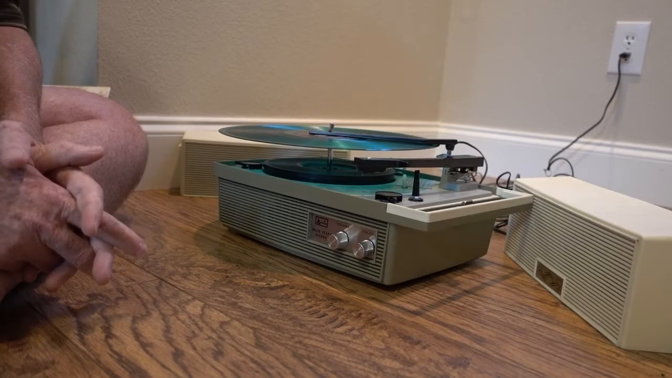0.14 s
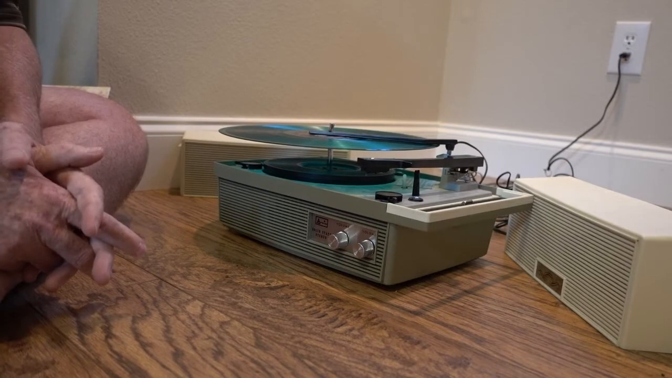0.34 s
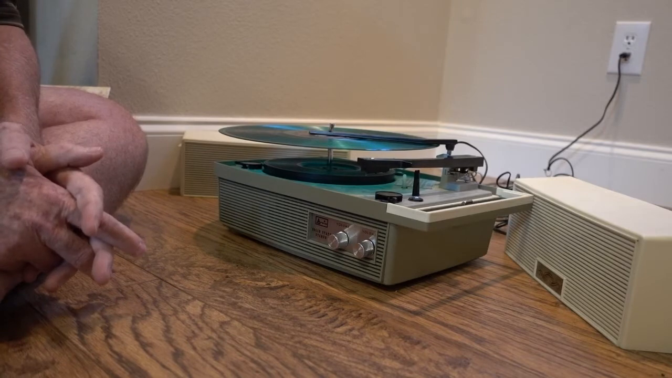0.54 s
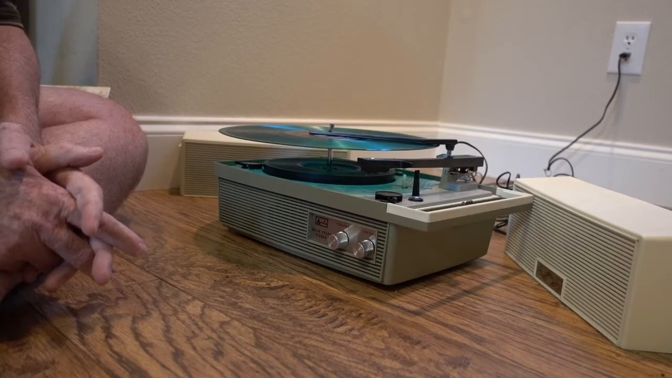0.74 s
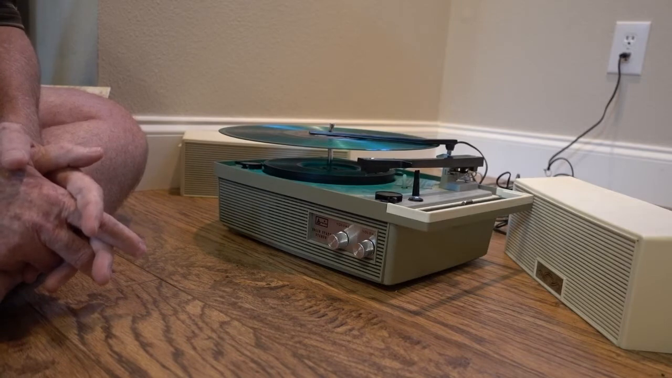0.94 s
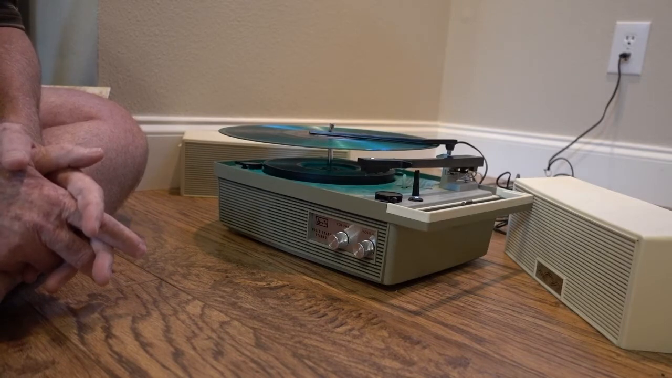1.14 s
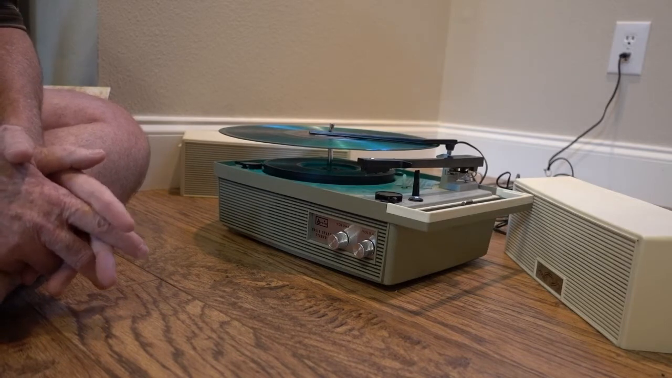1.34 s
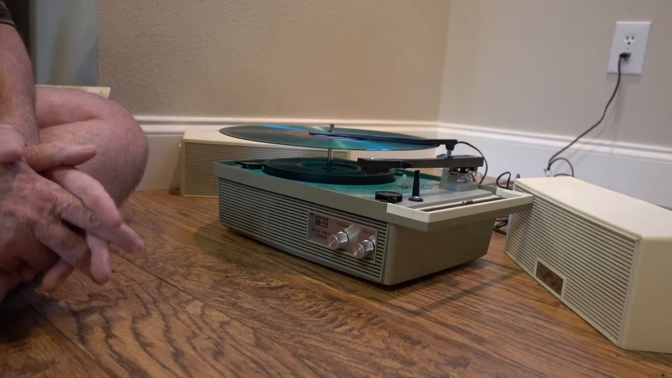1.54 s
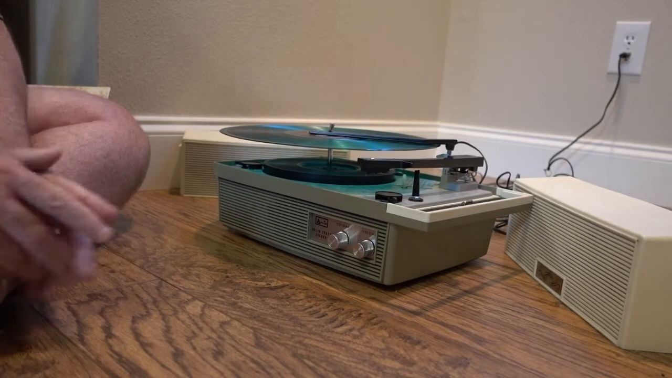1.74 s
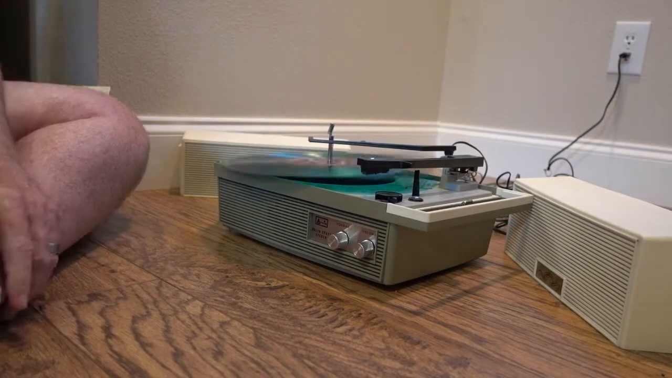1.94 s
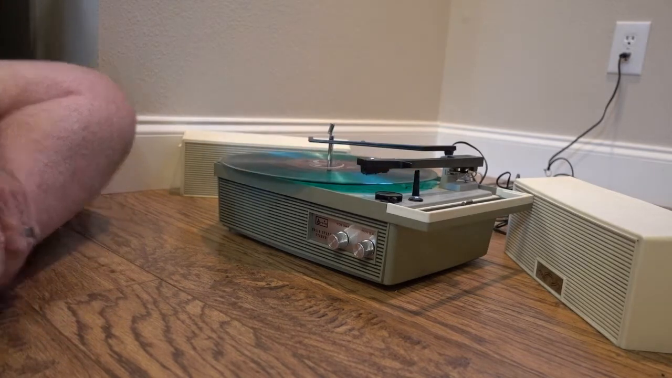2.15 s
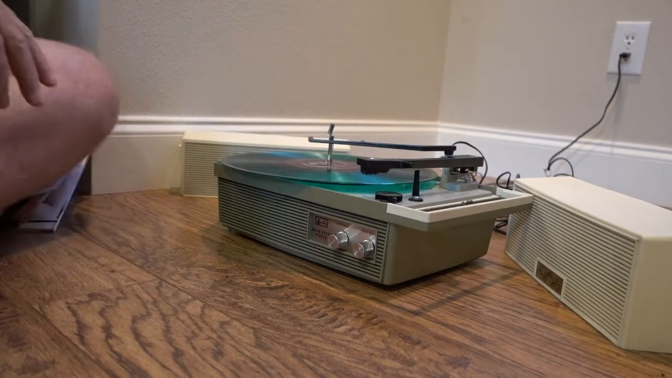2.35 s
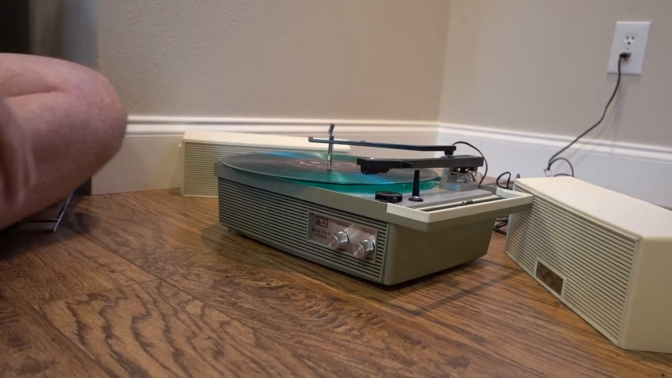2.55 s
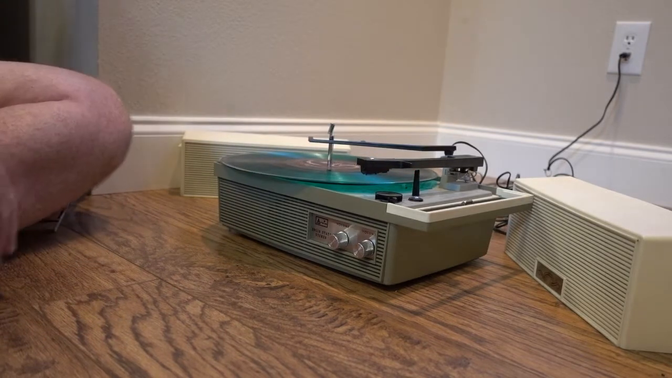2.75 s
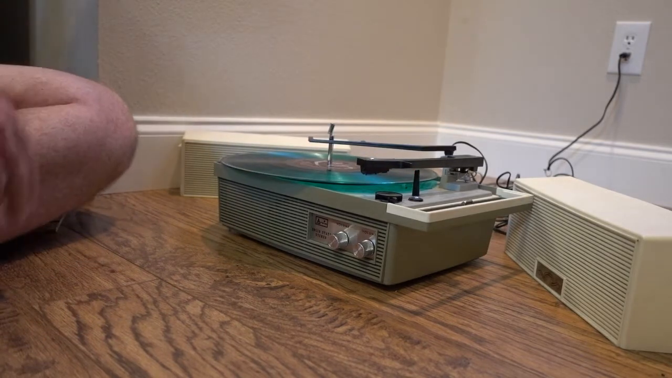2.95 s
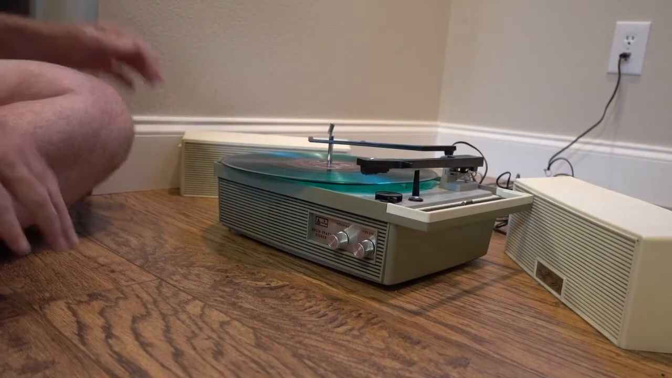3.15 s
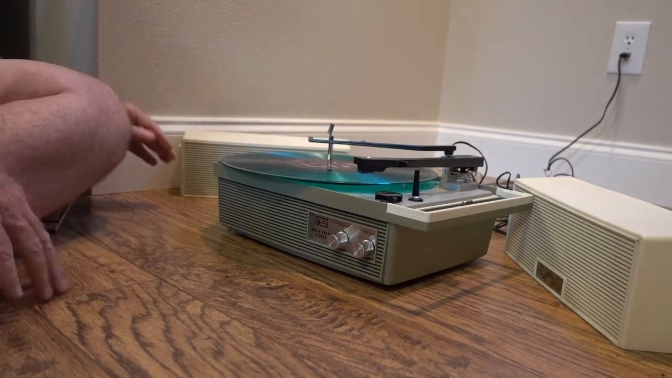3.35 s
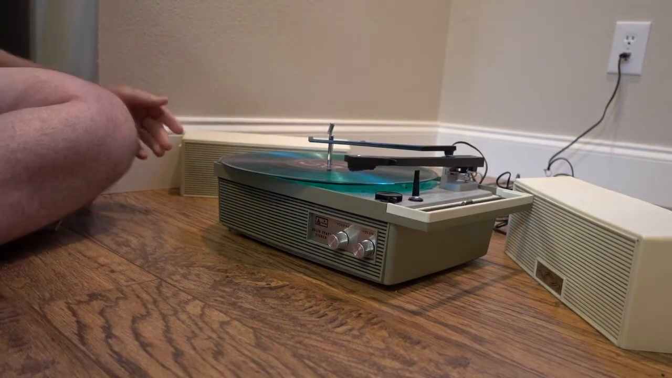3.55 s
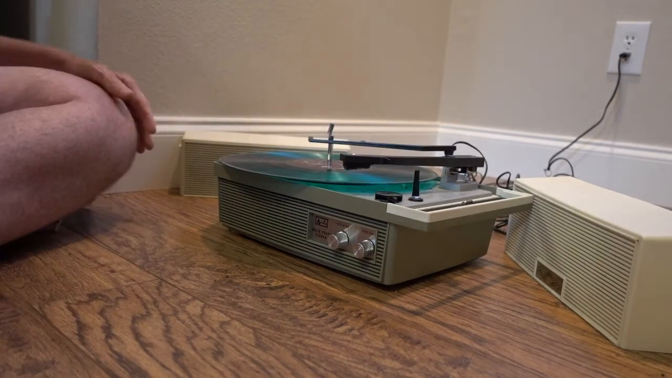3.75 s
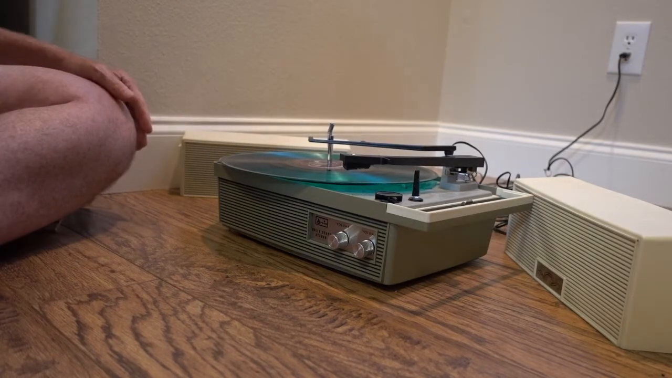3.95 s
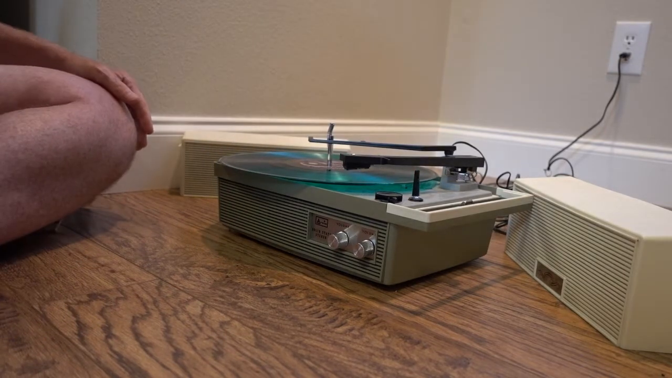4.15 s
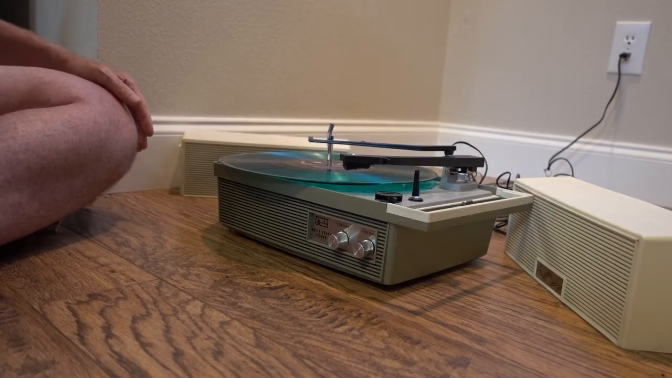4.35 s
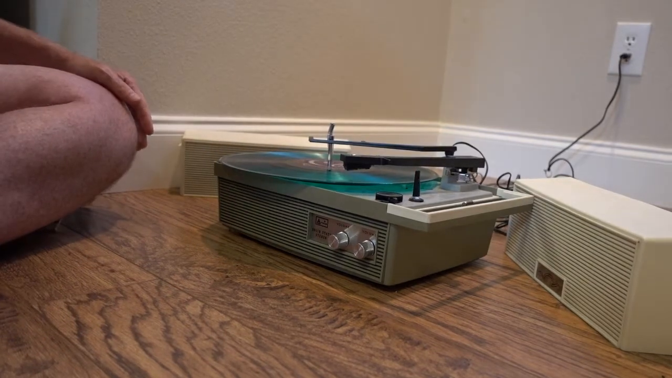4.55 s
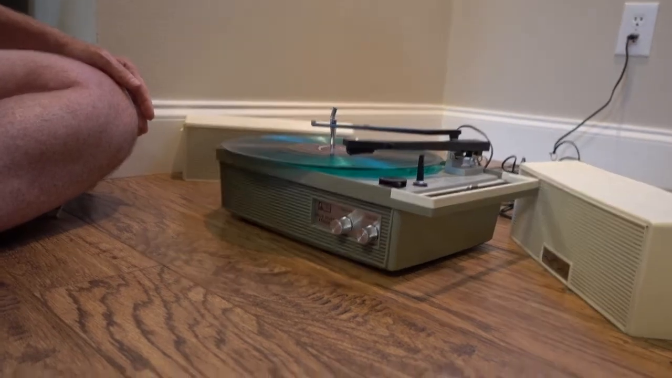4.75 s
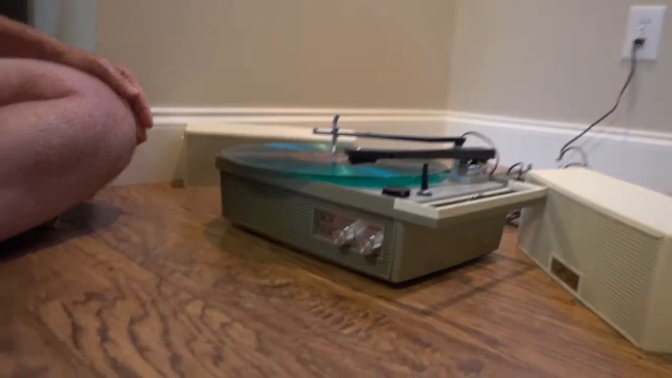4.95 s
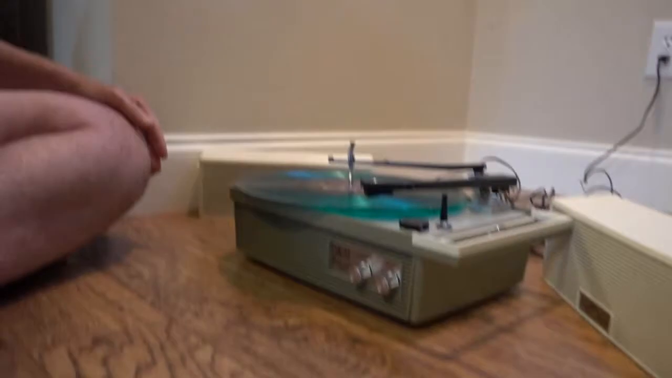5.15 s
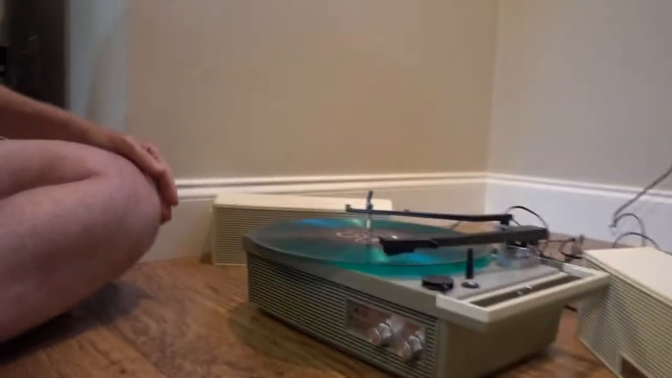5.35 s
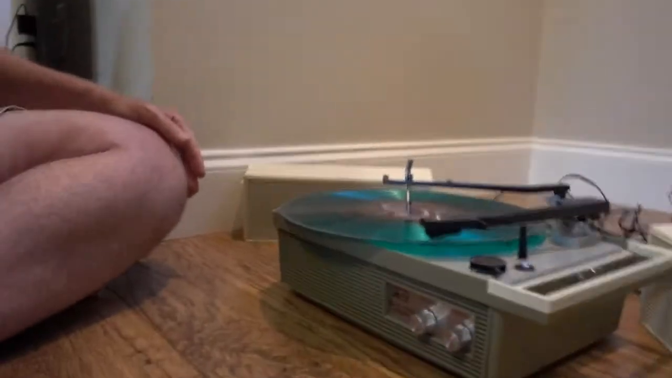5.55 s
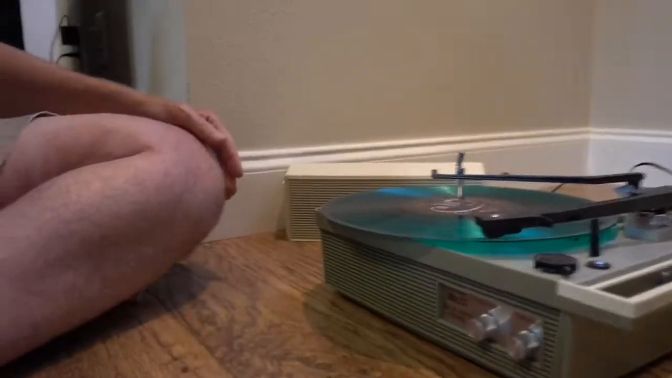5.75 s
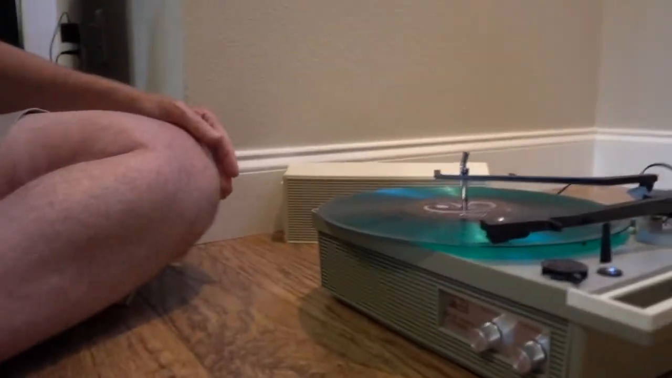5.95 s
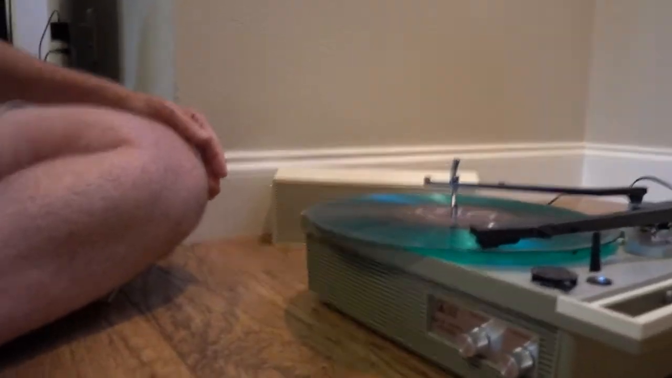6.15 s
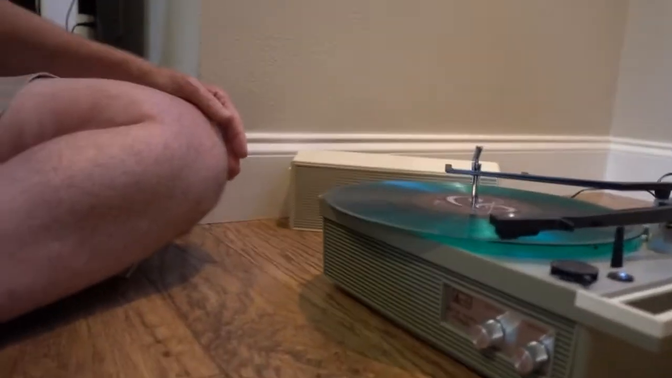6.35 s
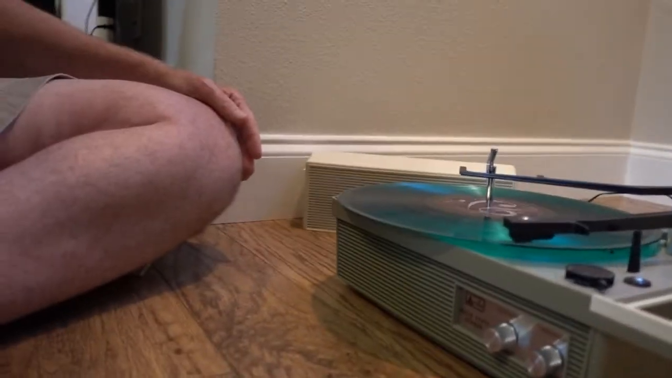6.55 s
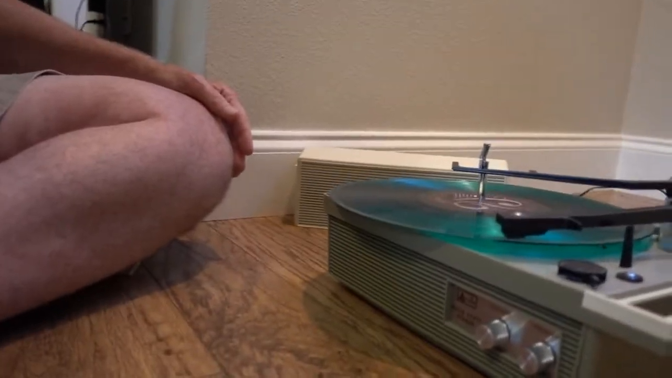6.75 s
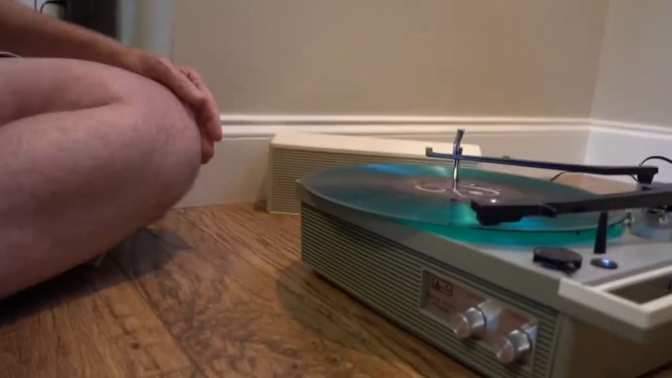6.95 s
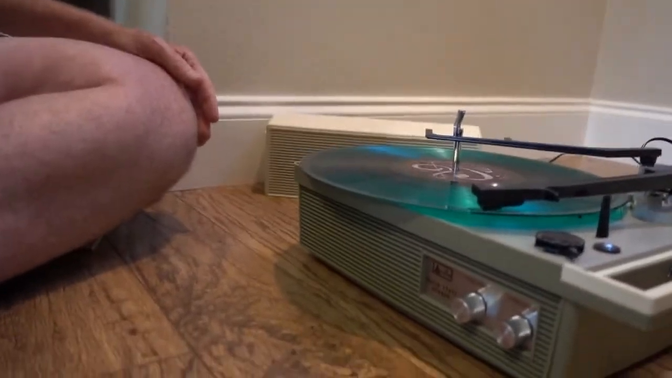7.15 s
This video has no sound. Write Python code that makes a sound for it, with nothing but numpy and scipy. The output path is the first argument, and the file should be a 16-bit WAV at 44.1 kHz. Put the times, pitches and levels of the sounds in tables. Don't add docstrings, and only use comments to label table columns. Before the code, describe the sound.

A small record changer cycles indoors: quiet ticks and whirr, a disc slides and clatters loudly onto the platter, later a sharp mechanical latch snap.

```python
import sys
import numpy as np
from scipy import signal
from scipy.fft import rfft, irfft, next_fast_len
from scipy.io import wavfile
from scipy.ndimage import map_coordinates

SR = 44100
rng = np.random.default_rng(int(sys.argv[2]) if len(sys.argv) > 2 else 0)


def volts_from_decibels(level):
    exponent = np.asarray(level, float) / 20
    return 10 ** exponent


def materialize(psi):
    bounded = np.clip(np.atleast_2d(psi).T, -1, 1)
    quanta = np.round(bounded * 32767).astype(np.int16)
    wavfile.write(sys.argv[1], SR, quanta)


N = 317368

# [f/Hz, level/dB per Hz]
WHIRR = [(120, -37), (200, -14.5), (281, -8.5), (409, -6.5), (446, -6.5), (566, -11), (889, -10.5),
         (1130, -15), (4000, -28), (5200, -47), (8800, -120)]
# [f/Hz, level/dB per Hz]
RUMBLE = [(7.1, -34.5), (12, -8.5), (27, -6.5), (65, -2), (97, -11.5), (128, -11), (145, -12.5),
          (177, -16.5), (300, -19), (390, -43.5), (660, -120)]


def unit(x):
    return x / np.sqrt(np.mean(x ** 2) + 1e-20)


def along(points, hz):
    f, value = np.transpose(points)
    return np.interp(np.log(hz + 1), np.log(f + 1), value)


def curves(rows):
    s, *columns = np.transpose(rows)
    return [np.interp(np.arange(N) / SR, s, column, -120, -120) for column in columns]


def wobble(rate):
    coarse = np.arange(0, N + 32, 32)
    knots = rng.standard_normal(int(N * rate / SR) + 4)
    smooth = map_coordinates(knots, [coarse * rate / SR])
    return np.interp(np.arange(N), coarse, smooth)


def swell(s, rise, fall):
    since = np.arange(N) / SR - s
    return -20 * np.maximum(since / fall, -since / rise)


def filtered(x, response):
    m = next_fast_len(x.shape[-1] + 8192)
    spectrum = rfft(x, m) * response(np.fft.rfftfreq(m, 1 / SR))
    return irfft(spectrum, m)[..., :x.shape[-1]]


def noise(spectrum):
    return unit(filtered(rng.standard_normal(N), lambda hz: volts_from_decibels(along(spectrum, hz))))


def modes(table, gains):
    def response(f):
        total = 0
        for k, ((hz, width, db), gain) in enumerate(zip(table, gains)):
            peak = 1j * f * width / (hz * hz - f * f + 1j * f * width)
            total = total + (-1) ** k * volts_from_decibels(db + gain) * peak
        return total
    return response


def body(scatter_db, detune=.012):
    # [f/Hz, width/Hz, level/dB]
    resonances = [(730, 23, -0.5), (970, 50, -5), (1240, 20, -9.5), (1420, 6.7, -12), (1850, 15, 9.5),
                  (1910, 1100, -1.5), (2200, 370, -2), (2197, 120, -10.5), (2728, 45, -2),
                  (3350, 150, -9.5), (3700, 70, 3), (4250, 44, -4.5), (4960, 130, 4), (5500, 180, -14.5),
                  (6916, 200, -20), (3080, 24000, -4.5)]
    chance = rng.normal(0, scatter_db, len(resonances))
    shifted = [(hz * (1 + detune * c), width, db) for (hz, width, db), c in zip(resonances, chance[::-1])]
    return modes(shifted, chance)


def split(x):
    borders = [600, 1300, 2600, 6000, 16000]
    filters = [signal.butter(3, borders[k:k + 2], "band", fs=SR, output="sos") for k in range(4)]
    return [signal.sosfilt(sos, x) for sos in filters]


def room(count=8, gap=.004):
    # [f/Hz, t60/s]
    decay = [(100, 1), (700, 0.51), (2000, 0.25), (5000, 0.46), (12000, 0.21)]
    hz, t = np.fft.rfftfreq(256, 1 / SR), np.arange(180) * 128 / SR
    a, b = rng.standard_normal((2, count, len(hz), len(t)))
    fading = (a + 1j * b) * volts_from_decibels(-60 * t / along(decay, hz)[:, None])
    tails = signal.istft(fading, SR, nperseg=256)[1]
    return iter([np.pad(tail / np.linalg.norm(tail), (int(gap * SR), 0)) for tail in tails] * 20)


def add(out, s, x, sent, tail):
    wet = signal.fftconvolve(sent, tail)
    out[round(s * SR):][:len(x)] += x
    out[round(s * SR):][:len(wet)] += wet


def drive():
    # [f/Hz, level/dB rms]
    tones = [(60, -72), (183, -72), (447, -80), (900, -83.5), (1000, -89)]
    # [t/s, level/dB]
    load = [(0, -2.5), (.44, 5), (.7, -3), (1.28, -1.5), (1.78, 2.5), (2.6, 0), (2.85, 3), (3.2, 6),
            (3.8, 0.5), (4.3, -1.5), (4.9, -1.5), (5.25, 1.5), (5.8, 1), (6.23, 9), (6.5, 3), (6.87, 0),
            (7.2, 3)]
    # [t/s, rise/s, fall/s, level/dB]
    shudder = [
        (2.07, .14, 0.19, -43),
        (3.4, 0.35, 0.55, -58),
    ]
    load_db, = curves(load)
    t = np.arange(N) / SR
    hum = 0
    for hz, db in tones:
        level = volts_from_decibels(db - 3.5 + 2.8 * wobble(15))
        hum = hum + level * np.sin(2 * np.pi * hz * t + 2.8 * wobble(1.8))
    whirr = volts_from_decibels(-68 + load_db + 1.2 * wobble(12.0) + 1.6 * wobble(50)) * noise(WHIRR)
    floor = volts_from_decibels(-58.5 - .2 * load_db)
    floor = floor + sum(volts_from_decibels(db + swell(s, rise, fall)) for s, rise, fall, db in shudder)
    return whirr + floor * volts_from_decibels(2.0 * wobble(27)) * noise(RUMBLE) + hum


def electronics():
    # [f/Hz, level/dB per Hz]
    hiss = [(880, -27.5), (1500, -6), (1640, -6.5), (2990, -9.5), (3530, -9), (9790, -12), (13500, -14)]
    own = 0
    for spectrum, db in [(hiss, -72.0), (WHIRR, -78), (RUMBLE, -83)]:
        own = own + volts_from_decibels(db) * np.array([noise(spectrum), noise(spectrum)])
    return volts_from_decibels(-74.5) * noise(hiss) + own


def offset(rise=.005, fall=.012, block_hz=1.2):
    # [level/dB, length/s]
    steps = [(-38, 0.018), (-38, 0.022), (-44, 0.032), (-41.5, .025), (-41.5, 0.015), (-43, 0.074),
             (-42.5, 0.08), (-46.5, 0.038), (-45, 0.071), (-43.5, 0.07), (-44.5, 0.035), (-47, 0.075),
             (-44.5, 0.081)]
    first_s, period_s = .088, .557
    elapsed = np.maximum(np.arange(N) / SR - first_s + rise, 0)
    turn, since = np.divmod(elapsed, period_s)
    db, length = np.array(steps)[turn.astype(int)].T
    fade = np.exp(-np.maximum(since - length + fall, 0) / fall)
    pulses = volts_from_decibels(db) * (1 - np.exp(-since / rise)) * fade
    return filtered(pulses, lambda f: 1j * f / (block_hz + 1j * f))


def knocks(wet_db=-14, ratio=1.39, third_db=-20):
    # [t/s, peak level/dB, f/Hz, t60/s]
    cabinet = [(0.163, -51.5, 375, 0.069), (0.338, -46, 248, 0.049), (0.511, -30, 366, 0.036),
               (0.941, -48, 350, 0.086), (1.247, -44.5, 142, 0.04), (1.247, -47.5, 330, 0.055),
               (4.416, -50, 261, 0.071), (4.582, -36, 355, 0.083), (4.833, -50, 132, 0.098),
               (4.975, -40.5, 402.4, 0.17), (5.169, -46, 460, 0.098), (5.389, -51, 394, 0.067),
               (5.497, -36, 443, 0.055), (5.8, -24.5, 300, 0.046), (5.812, -28, 330, 0.044),
               (5.902, -32, 326, 0.049), (5.975, -29.5, 332, 0.039), (6.027, -41.5, 307, 0.066),
               (6.121, -31.5, 563, 0.12), (6.137, -23, 412, 0.061), (6.196, -25, 271, 0.067),
               (6.25, -36, 330, 0.1), (6.634, -47, 364, 0.051), (6.868, -32.5, 344, 0.043),
               (6.288, -39.5, 290, 0.073)]
    # [t/s, peak level/dB, f/Hz, t60/s]
    landing = [(1.912, -40, 340, 0.18), (1.985, -35, 176.8, 0.47), (2.0, -47, 32.8, 0.56),
               (2.005, -19.5, 576, 0.093), (2.049, -25, 230, 0.1), (2.073, -32, 445, 0.023),
               (2.105, -42, 347, 0.13), (2.139, -31, 522, 0.18), (2.2755, -24.5, 558, 0.04),
               (2.329, -41, 372, 0.094), (2.528, -45, 140, 0.06)]
    # [t/s, peak level/dB, f/Hz, t60/s]
    weight = [(2.98, -40.5, 415, 0.14), (3.03, -54, 420, 0.082), (3.242, -36.5, 306, 0.078),
              (3.268, -30, 190, 0.052), (3.293, -24.5, 480, 0.024), (3.302, -38.5, 144.5, 0.36),
              (3.329, -33, 174, 0.072), (3.367, -44, 139, 0.06), (3.451, -44, 187, 0.086),
              (3.511, -43.5, 181.5, 0.07), (3.661, -49.5, 183, 0.12)]
    # [t/s, peak level/dB, f/Hz, t60/s]
    panels = [(0.167, -50, 586, 0.021), (1.981, -25, 975, 0.14), (2.009, -21, 460, 0.09),
              (2.012, -23, 183, 0.093), (2.012, -29, 994, .08), (2.109, -31, 566, 0.23),
              (2.151, -36.5, 988, .15), (4.9196, -28.5, 330.6, 0.12), (4.9195, -33, 456, 0.12),
              (4.9195, -35.5, 620, .045), (5.7597, -40.5, 330, 0.089), (5.7595, -37, 542, .04),
              (5.7848, -34.5, 304, .12), (5.7845, -34.5, 523, 0.085), (2.98, -47.5, 447, 0.18),
              (3.3, -44, 183, 0.8), (4.582, -50, 622, 0.095), (6.141, -33, 312, 0.17),
              (6.8386, -35, 324, 0.12), (6.838, -35, 490, 0.044), (.512, -45.5, 171, 0.15),
              (4.42, -54.5, 469.6, 0.12), (5.787, -40, 148.6, 0.11), (2.276, -33, 383, 0.11),
              (2.199, -40, 419, 0.16), (6.171, -34, 430, 0.088), (6.225, -37, 458, 0.08),
              (6.275, -40.5, 400, 0.066), (2.985, -45.5, 340, 0.18), (3.345, -37, 190, .12),
              (3.266, -40, 620, .05), (3.322, -39, 420, .07), (3.336, -43, 720, .06), (3.59, -48, 200, .12),
              (6.29, -38, 390, .06)]
    # [t60/s, upper mode level/dB at 330 Hz, floor board level/dB]
    pushes = [
        (0.011, -6.5, -11),
        (0.014, -4, -18),
        (0.0062, -17, -16),
        (0.004, -31, -28.5),
    ]
    out, t, tails = np.zeros(N + 2 * SR), np.arange(SR // 4) / SR, room()

    def tone(hz):
        return np.sin(2 * np.pi * hz * t)

    for rows, (push, middle_db, under_db) in zip([cabinet, landing, weight, panels], pushes):
        rise = (1 - volts_from_decibels(-60 * t / max(push, .001))) ** 2
        for s, db, hz, t60 in rows:
            t60 = max(t60, .01)
            upper_db = middle_db - 4.5 * np.log2(hz / 330)
            upper = tone(ratio * hz) + volts_from_decibels(third_db) * tone(2.9 * hz)
            ring = tone(hz) + volts_from_decibels(upper_db - 30 * t / t60) * upper + volts_from_decibels(under_db) * tone(165)
            ring = -volts_from_decibels(db + 2.0 - 60 * t / t60) * rise * ring
            add(out, s, ring, volts_from_decibels(wet_db) * ring, next(tails))
    return out[:N]


def contacts(wet_db=-7, chatter_db=-9):
    # [t/s, peak level/dB, plate level/dB, ring level/dB, edge level/dB]
    cams = [(0.166, -70, 6, -15, -14), (0.3352, -47.5, 3, -15, -23), (0.5095, -41, 4.5, -6, -14.5),
            (0.9434, -56.5, 3, -26, -27), (1.2466, -59, 9, -22, -22), (1.3934, -54, 0.5, -2, -12),
            (1.4716, -47.5, 1.5, -1, -4), (4.575, -44.5, -0.5, -3.5, -3), (4.9205, -52, 1.5, -8, -10),
            (4.977, -42.5, 2, 3, 0.5), (5.1691, -45, -9, 0, -7.5), (5.495, -48.5, 5.5, 8.5, 5.5),
            (5.5822, -54, -18, -2, -11), (5.7627, -53, 5, -32, -26), (5.784, -50, 12, -29, -35),
            (5.7995, -50.5, -8, -14, -21), (5.8499, -58, 7, -26.5, -21), (6.0697, -54, 1.5, -7.5, -21),
            (6.1216, -37, 5, -2.5, -4), (6.1364, -21, -12.5, 0, -9), (6.1836, -30, 0, -8, -3),
            (6.8452, -56.5, 6, -2, -2.5)]
    # [t/s, peak level/dB, plate level/dB, ring level/dB, edge level/dB]
    disc = [
        (1.91, -36.5, -2, -9, -22),
        (1.9494, -39, -3, -1.5, -16.5),
        (1.9582, -34, 3, -7, -10.5),
        (1.9845, -14, -6.5, -7, -8),
        (1.9905, -16, -7.5, -9.5, -5.5),
        (2.0092, -14, -13, 2, -7),
        (2.0498, -22.5, -7.5, 1, -13),
        (2.1092, -24, -32, 0, -11),
        (2.165, -24, -5, -9, -30),
        (2.2775, -34, 3.5, -18, -29),
    ]
    # [t/s, peak level/dB, plate level/dB, ring level/dB, edge level/dB]
    taps = [
        (2.9784, -45.5, -2, -15, -16),
        (3.236, -43, -7, -35, -13.5),
        (3.2922, -45.5, 7.5, -24, -25),
        (3.6226, -54, -10, -14, -7.5),
        (3.664, -46.5, -2.5, -5, -7.5),
    ]
    # [t/s, peak level/dB, plate level/dB, ring level/dB, edge level/dB]
    scrapes = [
        (1.9214, -35, 4, 0, -8),
        (1.9752, -32, -9, 10, 5.5),
        (2.9166, -47.5, -9, -18, -21.5),
        (5.3478, -48.5, -7, -7.5, -12),
    ]
    # [t60/s, extra level/dB, rise/s]
    chatter = [
        (0.055, 5, .001),
        (0.029, -2, 0.00015),
        (0.046, 3, 0),
        (0.07, 14.5, .005),
    ]
    # [f/Hz, level/dB]
    around = [(2400, 1.5), (2950, -11), (3400, 1), (4400, -4), (6500, 1), (13000, -1.5)]
    out, t, tails = np.zeros(N + 2 * SR), np.arange(SR // 5) / SR, room()
    blow = 1. * (t == 0)
    even = [p / np.linalg.norm(p) for p in split(filtered(blow, body(scatter_db=0)))]
    even = filtered(np.roll(even, 300, axis=1), lambda f: volts_from_decibels(along(around, f)))[:, 200:]
    for rows, (t60, extra_db, rise) in zip([cams, disc, taps, scrapes], chatter):
        for s, db, plate_db, ring_db, edge_db in rows:
            hard_db = .42 * (db + 45)
            fade_db = chatter_db + extra_db - hard_db - 60 * t / np.clip(t60, .002, .15)
            force = blow + rng.standard_normal(len(t)) * volts_from_decibels(fade_db)
            force = force * np.minimum(1, (t + 1 / SR) / max(rise, 1 / SR))
            levels = db + np.array([plate_db, 0, ring_db + 4.0, edge_db + 10.0])
            ranges = split(filtered(force, body(scatter_db=2.5)))
            parts = [volts_from_decibels(level) * p / np.abs(p).max() for level, p in zip(levels, ranges)]
            sent = sum(np.linalg.norm(p) * e for p, e in zip(parts, even))
            add(out, s, sum(parts), volts_from_decibels(wet_db) * sent, next(tails))
    return out[:N]


def rings(wet_db=-8):
    # [t/s, peak level/dB, f/Hz, t60/s]
    parts = [(.337, -39.5, 984, 0.084), (1.984, -3.5, 2200, 0.015), (2.010, -6, 2200, 0.057),
             (2.014, -18, 1776, 0.45), (2.0094, -9, 3350, 0.03), (2.010, -12.5, 5280, 0.038),
             (2.110, -25, 5370, 0.014), (2.278, -22.5, 770, 0.051), (4.979, -39, 3250, 0.057),
             (5.17, -41, 1755, 0.24), (5.498, -40, 3350, 0.059), (5.7905, -27, 754, 0.051),
             (6.137, -17, 1044, 0.1), (6.138, -45.5, 1790, 0.34), (6.137, -10, 3610, 0.019),
             (6.139, -23.5, 4250, 0.11), (6.139, -36, 3300, 0.1), (6.138, -24, 2250, 0.1),
             (1.83, -50.5, 2750, .4), (1.984, -18, 1600, .034), (2.069, -24, 1770, .2),
             (2.1586, -18, 5400, 0.011), (2.165, -18.5, 5640, 0.0089), (2.29, -50, 7600, .012),
             (5.198, -38, 1790, .08), (5.58, -51, 2100, .04), (6.185, -26, 1850, .1),
             (2.058, -12, 3530, .015), (2.1097, -26, 4530, .012), (2.279, -31, 950, 0.052),
             (3.3, -32.5, 895, 0.039), (3.36, -44, 1506, 0.1), (2.1096, -13.5, 6000, .005),
             (6.137, -7, 1500, 0.0074), (6.1367, -9.5, 3400, 0.0096), (5.785, -37.5, 1700, .03),
             (5.83, -39, 766, .08), (3.295, -45, 1610, .03), (5.175, -46, 1270, 0.18),
             (5.26, -53, 1714, .2), (2.02, -19, 780, .1), (6.184, -30, 10300, .03), (.946, -50, 1420, .06),
             (1.248, -45, 1500, .025), (1.474, -42, 1300, .04), (5.121, -57, 2450, .05),
             (5.185, -45, 2250, .03), (5.171, -43, 6100, .06), (5.171, -45, 4900, .1),
             (6.139, -19, 1850, .12)]
    out, t, tails = np.zeros(N + 2 * SR), np.arange(SR // 2) / SR, room()
    for s, db, hz, t60 in parts:
        pair = np.sin(2 * np.pi * hz * t) + .5 * np.sin(2 * np.pi * 0.975 * hz * t)
        ring = volts_from_decibels(db - 9.5 - 60 * t / max(t60, .004)) * pair
        add(out, s, ring, volts_from_decibels(wet_db) * ring, next(tails))
    return out[:N]


def cracks(broad=1.5):
    # [t/s, peak level/dB, centre f/Hz, t60/s]
    touches = [(.337, -48, 1300, .04), (.511, -42, 1400, .04), (.944, -54, 1100, .03),
               (1.394, -54, 3200, .02), (1.9015, -47, 6000, .015), (1.9105, -36, 2200, .04),
               (1.9218, -36, 4000, .04), (1.9487, -35, 6000, .015), (1.9577, -32, 5000, .03),
               (1.9745, -25, 6000, .05), (2.0089, -7, 2800, .014), (2.0493, -17, 3200, .01),
               (2.0575, -20, 3300, .008), (2.1089, -14, 3600, .008), (2.1655, -30, 4500, .008),
               (2.289, -47, 7000, .01), (4.5755, -46, 5000, .02), (4.927, -50, 6000, .06),
               (5.169, -37, 3500, .012), (5.229, -52, 4500, .012), (5.4955, -43, 7000, .04),
               (6.1218, -38, 10000, .03), (6.1363, -11, 3300, .012), (6.138, -22, 6000, .07),
               (6.1836, -36, 10500, .03), (6.845, -57, 6500, .05)]
    out, t = np.zeros(N), np.arange(SR // 20) / SR
    spits = rng.standard_normal((len(touches), len(t)))
    for (s, db, hz, t60), spit in zip(touches, spits):
        push = (np.sign(spit) + .4 * spit) * volts_from_decibels(-60 * t / max(t60, .002))
        edge = filtered(push, lambda f: modes([(hz, broad * hz, 0)], [0])(f) ** 2)
        out[round(s * SR):][:len(t)] += volts_from_decibels(db) * edge / np.abs(edge).max()
    return out


def rattle(density=4000, spread_db=1.8):
    # [t/s, level/dB]
    slide = [
        (1.712, -70),
        (1.75, -60),
        (1.80, -59.5),
        (1.88, -58.5),
        (1.9, -60),
    ]
    # [t/s, level/dB]
    rock = [
        (1.899, -48),
        (1.914, -45),
        (1.967, -35.5),
        (1.985, -29),
        (2.08, -31),
        (2.296, -47.5),
        (2.418, -55.5),
        (2.752, -73),
    ]
    # [t/s, level/dB]
    buzz = [
        (6.139, -30.5),
        (6.17, -38),
        (6.208, -41),
        (6.46, -71),
        (6.65, -87.5),
    ]
    # [t/s, level/dB]
    tremble = [
        (5.17, -55),
        (5.2, -58),
        (5.235, -61),
        (5.33, -76),
    ]
    # [cabinet level/dB, ring level/dB, edge level/dB, dulling/dB per s]
    colours = [
        (-10, -2, -5, -30),
        (-2.5, -7, -11, 4.5),
        (-1.5, -12, -3, -9.5),
        (-20, 2, -3, -15),
    ]
    # [f/Hz, level/dB per Hz]
    under = [(59, -34.5), (100, -9.5), (291, -7), (328, -8), (374, -5), (562, -9), (700, -9.5), (910, -40),
             (1540, -120)]
    hits = rng.random(N) < density / SR
    taps = hits * rng.standard_normal(N) * volts_from_decibels(spread_db * wobble(80))
    plate, deck, ring, edge = split(filtered(taps, body(scatter_db=1.5)))
    thud, out = noise(under) * volts_from_decibels(1.1 * wobble(40)), 0
    for rows, (cabinet_db, ring_db, edge_db, dulls_db) in zip([slide, rock, buzz, tremble], colours):
        rattle_db, = curves(rows)
        dull_db = dulls_db * np.clip(np.arange(N) / SR - rows[0][0], 0, 1)
        bright = volts_from_decibels(dull_db) * (volts_from_decibels(ring_db) * unit(ring) + volts_from_decibels(edge_db) * unit(edge))
        out = out + volts_from_decibels(rattle_db - 0.5) * (unit(plate + deck) + volts_from_decibels(cabinet_db) * thud + bright)
    return out


def shiver(rise=.002, sing_rise=.01, blur=2.8):
    # [f/Hz, width/Hz, level/dB]
    spindle = [(2860, 29, -1), (3370, 31, 0), (3820, 46, 0), (4180, 36, -1), (5600, 86, -3), (6200, 88, -6),
               (6750, 32, -3), (7700, 39, -4), (8700, 110, -8), (9230, 53, -7), (10400, 57, -8),
               (11800, 49, -11)]
    # [f/Hz, width/Hz, level/dB]
    linkage = [(1048, 35, -3.5), (1270, 40, 1.5), (1780, 140, -0.5), (2290, 34, -4.5), (3400, 160, -15),
               (4230, 140, -13), (4900, 73, -16), (5740, 120, -17), (6400, 150, -14), (7120, 200, -14)]
    # [t/s, fall/s, level/dB]
    sing = [
        (1.729, .13, -56),
        (1.772, .12, -62),
        (1.905, .1, -58),
    ]
    # [t/s, fall/s, level/dB]
    shivers = [
        (2.012, 0.29, -32.5),
        (5.175, 0.15, -56),
        (5.498, 0.1, -58),
        (6.139, 0.22, -34),
    ]

    def steel(table):
        response = modes([(hz, blur * width, db / 2) for hz, width, db in table], np.zeros(len(table)))
        return unit(filtered(rng.standard_normal(N), lambda f: response(f) ** 2))

    song = sum(volts_from_decibels(db + swell(s, sing_rise, fall)) for s, fall, db in sing)
    levers = sum(volts_from_decibels(db + swell(s, rise, fall)) for s, fall, db in shivers)
    return song * steel(spindle) + levers * steel(linkage)


def scuff():
    # [f/Hz, level/dB per Hz]
    colour = [(1500, -25), (2600, -8), (3500, 0), (7500, -3), (10000, -7), (13500, -11)]
    # [t/s, rise/s, fall/s, level/dB]
    rub = [
        (1.73, .012, .2, -57),
        (1.775, .03, .2, -61),
    ]
    pressure = sum(volts_from_decibels(db + swell(s, rise, fall)) for s, rise, fall, db in rub)
    return pressure * volts_from_decibels(1.5 * wobble(90)) * noise(colour)


def shuffle():
    # [f/Hz, level/dB per Hz]
    cloth_colour = [(710, -47), (1200, -6), (2120, -3.5), (2410, -8), (5770, -10), (10500, -16),
                    (13500, -21)]
    # [f/Hz, level/dB per Hz]
    board_colour = [(18, -38), (30, 3.5), (108, -8.5), (150, -3), (266, -3), (298, -24), (333, 1),
                    (2160, -25), (2500, -35), (3250, -73), (5500, -120)]
    # [t/s, rise/s, fall/s, hiss level/dB, board level/dB]
    drags = [
        (2.975, .2, 0.12, -56.5, -45.5),
        (3.249, 0.025, 0.18, -55, -34.5),
        (3.297, 0.025, 0.1, -80, -30),
        (3.405, 0.074, 0.19, -59.5, -44.5),
        (3.66, 0.065, 0.28, -64, -50),
        (5.42, .08, 0.22, -64.5, -46),
    ]
    hiss, board = 0, 0
    for s, rise, fall, hiss_db, board_db in drags:
        pressure_db = swell(s, rise, fall)
        hiss = hiss + volts_from_decibels(pressure_db + hiss_db)
        board = board + volts_from_decibels(pressure_db + board_db)
    cloth = hiss * volts_from_decibels(1.2 * wobble(70)) * noise(cloth_colour)
    return cloth + board * volts_from_decibels(-10.5 + 1.8 * wobble(40)) * noise(board_colour)


def scene():
    player = contacts() + rings() + rattle() + shiver()
    player = filtered(player, lambda f: 1 / (1 + 1j * f / 9000) ** 2)
    return np.tile(player + knocks() + shuffle() + drive() + cracks() + scuff(), (2, 1))


def band_limit(x):
    return signal.sosfilt(signal.butter(12, 14480, fs=SR, output="sos"), x)


def record(dry):
    x = dry + electronics() + offset()
    x = filtered(x, lambda f: 1 / np.sqrt(1 + (f / 13250) ** 100))
    return band_limit(x)


dry = scene()
out = record(dry)
materialize(out)
```